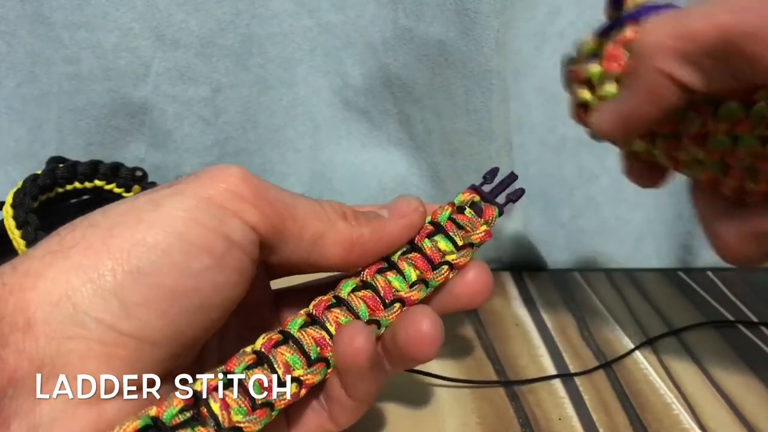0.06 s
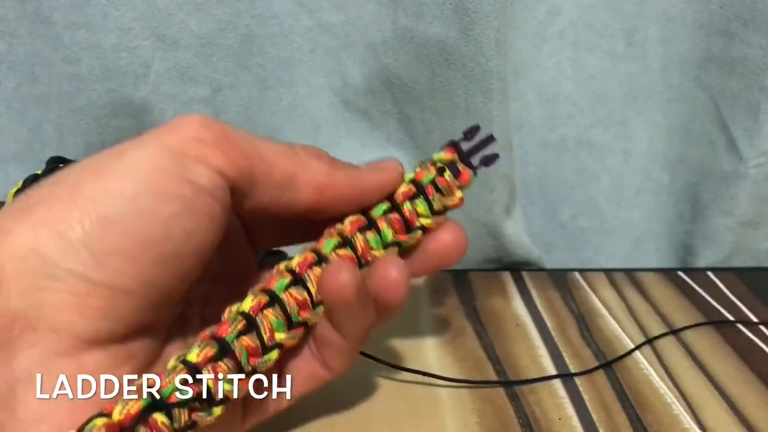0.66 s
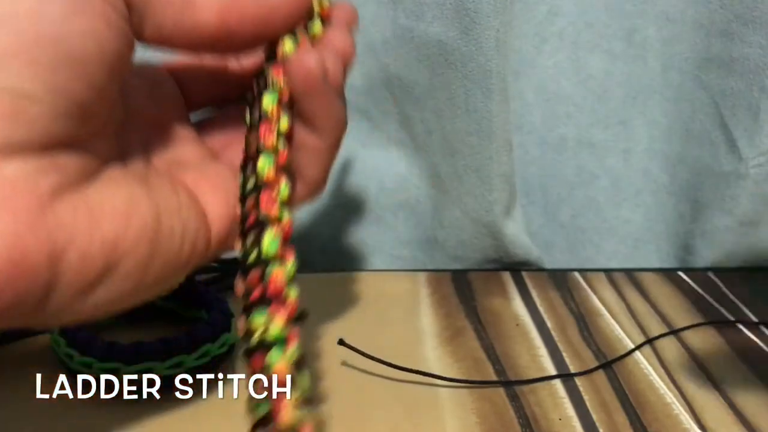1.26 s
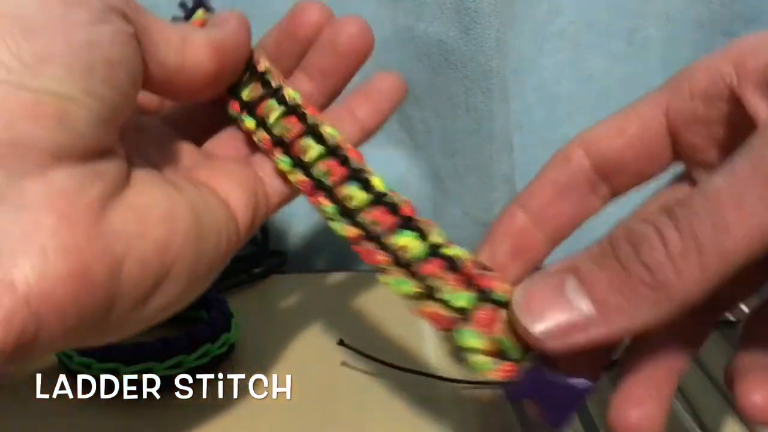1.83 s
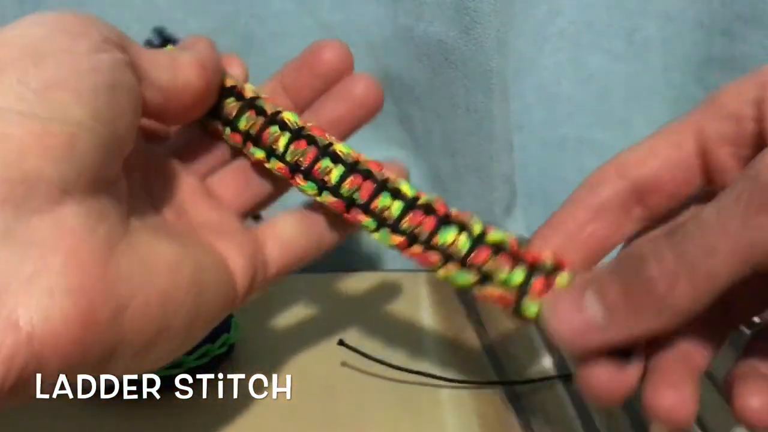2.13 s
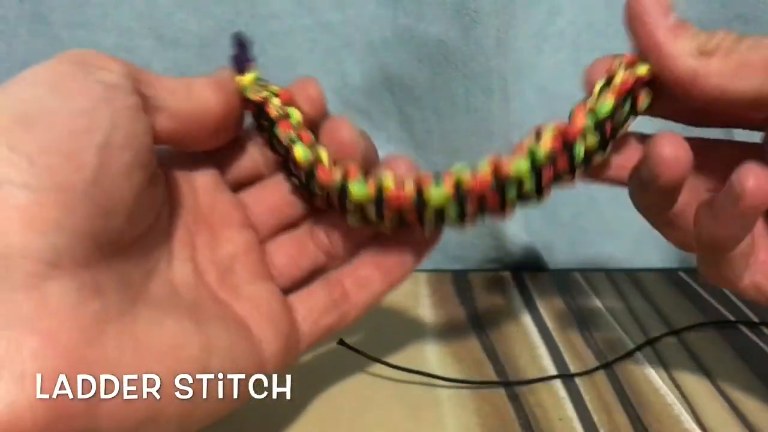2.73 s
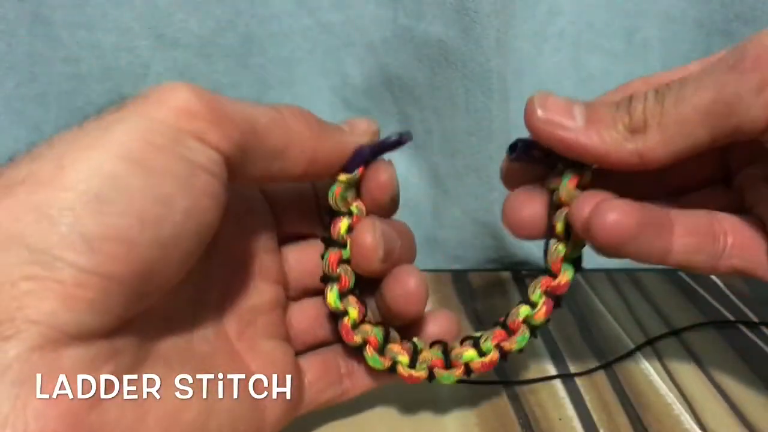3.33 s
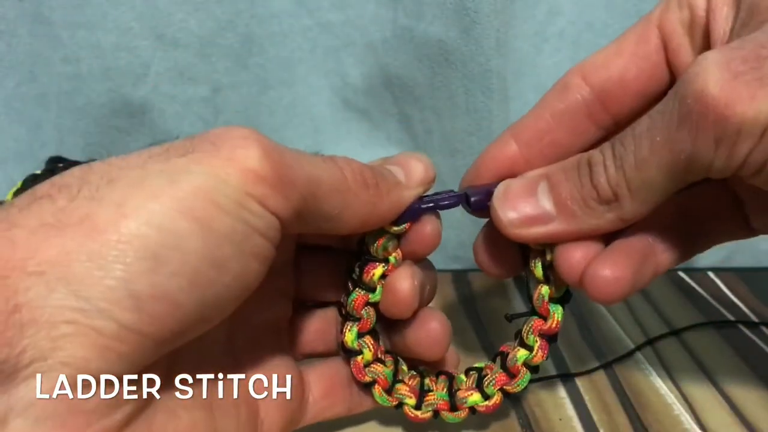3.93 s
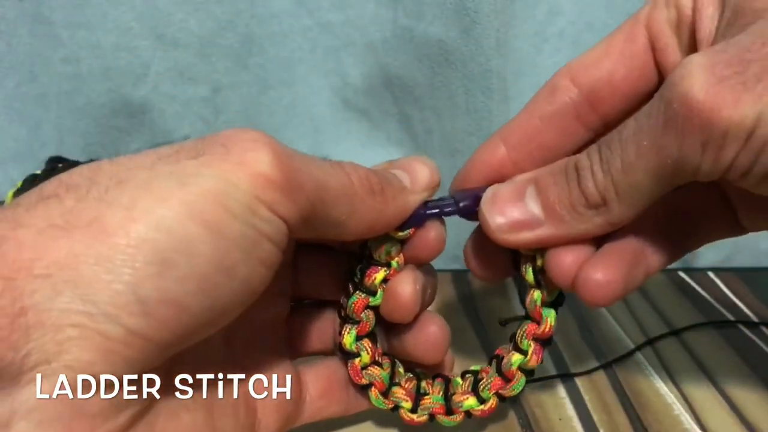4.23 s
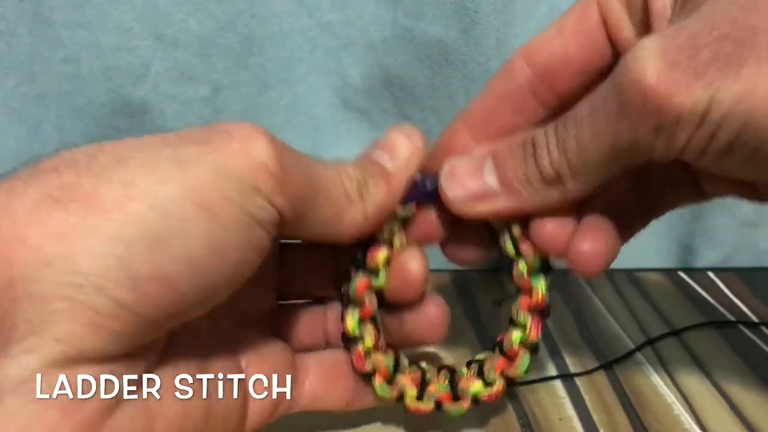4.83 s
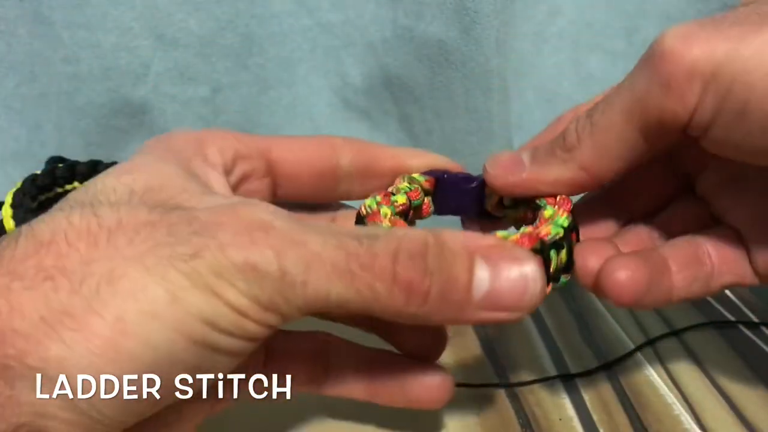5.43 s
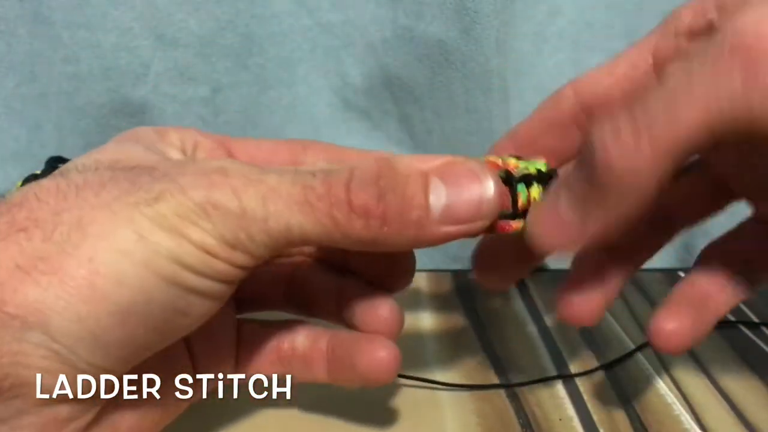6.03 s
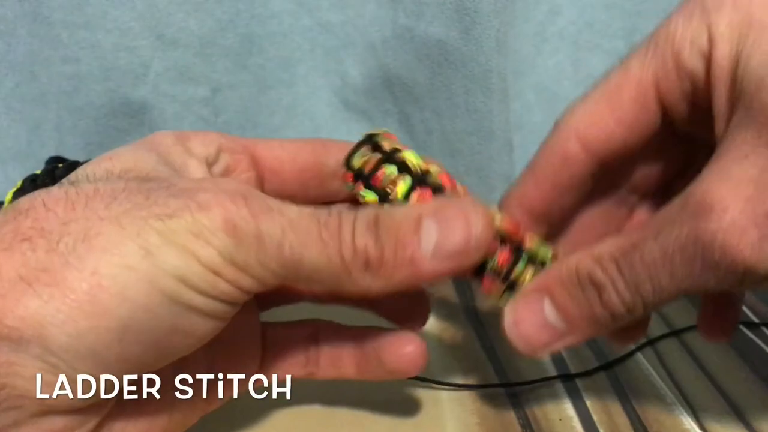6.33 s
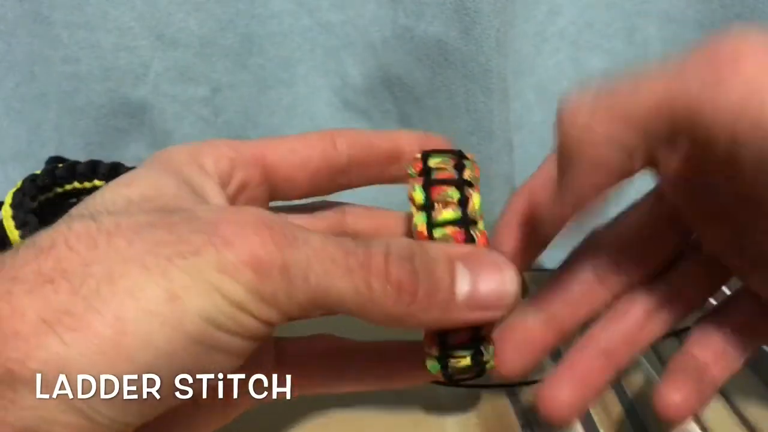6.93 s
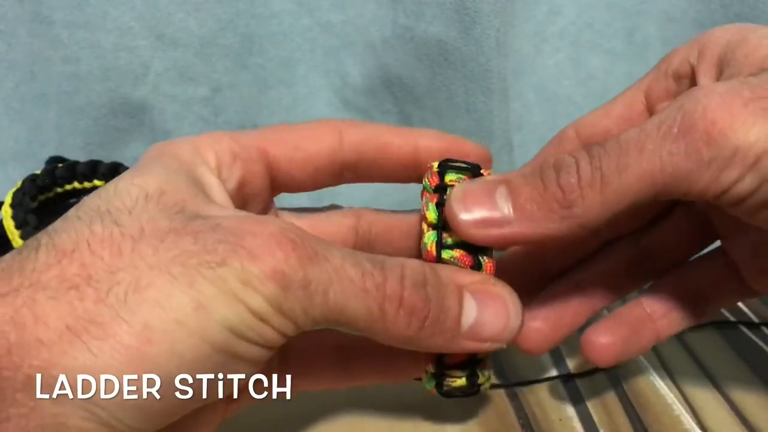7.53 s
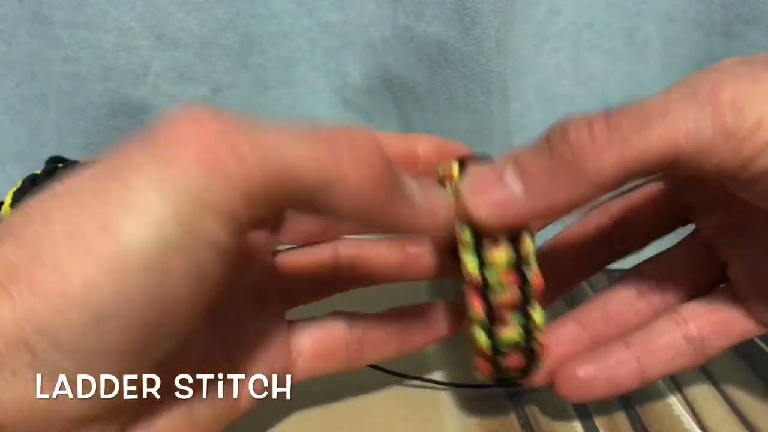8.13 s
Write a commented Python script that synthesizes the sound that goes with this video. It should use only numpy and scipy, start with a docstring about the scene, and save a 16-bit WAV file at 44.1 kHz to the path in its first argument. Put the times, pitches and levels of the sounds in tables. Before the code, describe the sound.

Soft, scratchy rustles come from a cord bracelet flexed between fingers, with one dull table bump early on. Small plastic ticks lead to a loud, crisp buckle snap a little past halfway, followed by a brief faint rise in hiss and a smaller click. Light handling then resumes. The sound is close and fairly dry, in a small room with a low fan and motor hum and faint electrical ticking.

```python
"""A woven cord bracelet and its plastic buckle, handled close to a microphone in a small, quiet room.
The weave rustles in short strokes of tiny fibre clicks; a hand bumps the table. The buckle halves
tick together, snap shut with a crack and a ring, and click again as they seat.
After the snap, the microphone's hiss rises for a moment and drops away.
Walls answer briefly over rumble, hiss, a distant fan and motor, and faint electrical ticking."""
import sys
import numpy as np
from scipy import signal
from scipy.fft import rfft, irfft, next_fast_len
from scipy.io import wavfile
from scipy.ndimage import uniform_filter1d, map_coordinates

SR = 44100
rng = np.random.default_rng(int(sys.argv[2]) if len(sys.argv) > 2 else 0)


def file_out(sig):
    """Save sig as 16-bit WAV at sys.argv[1]."""
    # one column per channel
    cols = np.atleast_2d(sig).T
    # limit, then scale
    lim = np.clip(cols, -1, 1)
    pcm = np.round(lim * 32767).astype(np.int16)
    wavfile.write(sys.argv[1], SR, pcm)


N = 360297
TIME = np.arange(N) / SR

# fibre hiss spectrum: f/Hz, level/dB
FIBRE_SPECTRUM = [(600, -16), (1500, -4), (2600, -2), (3700, -0.5), (5000, 2.5), (6800, -1.5), (8500, -1),
                  (10400, -5.5), (12200, 0), (15500, -7)]
# open buckle: f/Hz, level/dB, t60/s
OPEN_MODES = [(2490, -13, .018), (3573, -16.3, .0038), (3900, -.5, .0052), (4230, 6.3, .0051),
              (5800, -3.2, .008), (6540, 1.2, .0068), (7342, -8.7, .0061), (7687, -1.2, .0105),
              (8440, -2.5, .009), (11340, -1, .008), (12358, -12, .007), (13491, -12.5, .0062),
              (15159, -14.5, .01)]
# hollow knock of the buckle between fingers: f/Hz, level/dB, t60/s
KNOCK_MODES = [(420, -13, 0.0088), (740, -10, 0.007), (1220, -2.5, .013), (1530, -3.5, 0.01),
               (2392, -2, 0.018)]
# hands jolted by the prongs: f/Hz, level/dB, t60/s
HAND_MODES = [(85.2, -47, 0.11), (160, -48, 0.062), (309.8, -46, 0.034), (720, -44.5, .009)]


def undb(db):
    """Decibels to gain."""
    return 10 ** (np.asarray(db) / 20)


def unit(x):
    """Scale to rms 1."""
    return x / np.sqrt(np.mean(x ** 2))


def crest(x):
    """Scale to peak 1."""
    return x / np.abs(x).max()


def add(out, start_s, x):
    """Mix x into out from start_s on."""
    i = int(round(start_s * SR))
    x, i = x[max(-i, 0):], max(i, 0)
    out[i:i + len(x)] += x[:max(len(out) - i, 0)]


def colour(x, spectrum):
    """Filter by a curve of f/Hz, level/dB."""
    hz, db = np.transpose(spectrum)
    size = next_fast_len(len(x))
    bins_hz = np.maximum(np.fft.rfftfreq(size, 1 / SR), 1)
    gain = undb(np.interp(np.log(bins_hz), np.log(hz), db))
    return irfft(rfft(x, size) * gain, size)[:len(x)]


def resonate(x, hz, width_hz, stages=1):
    """Equal resonances in series, each width_hz wide, gain 1 at the centre."""
    hz, width_hz = min(hz, SR / 2 - 1000), min(width_hz, SR / 3)
    for _ in range(stages):
        x = signal.lfilter(*signal.iirpeak(hz, hz / width_hz, fs=SR), x)
    return x


def fade(t, t60_s):
    """Exponential decay, 60 dB in t60_s."""
    return np.exp(-np.log(1000) * t / t60_s)


def ring(modes, t, t60_scale=1):
    """Struck modes of alternating sign; a grip scales their decay time."""
    return sum((-1) ** k * undb(db) * np.sin(2 * np.pi * hz * t) * fade(t, t60_s * t60_scale)
               for k, (hz, db, t60_s) in enumerate(modes))


def burst(t, t60_s):
    """Decaying white noise."""
    return rng.standard_normal(len(t)) * fade(t, t60_s)


def grains(count, per_s=3000, spread_db=2.5):
    """Tiny random clicks, most weak, a few strong."""
    clicks = (rng.random(count) < per_s / SR) * rng.choice([-1, 1], count)
    return clicks * undb(spread_db * np.minimum(rng.exponential(size=count), 4))


def waver(count, window):
    """Random wobble of rms 1, smoothed twice over window samples."""
    return unit(uniform_filter1d(uniform_filter1d(rng.standard_normal(count), window), window))


def radiate(x, cutoff_hz=2150):
    """High-pass: the small buckle hardly moves air at low pitch."""
    return signal.sosfilt(signal.butter(4, cutoff_hz, "high", fs=SR, output="sos"), x)


def rustle(firm_db=-64.5, rasp_rel_width=.19, second_db=-6, swell_share=.23, release_s=.016):
    """Fibres slip and snag; the ribs of the weave rasp in two bands that follow finger speed."""
    # cord sliding on skin and itself: t/s, length/s, level/dB, main rasp/Hz, second rasp/Hz, snags/dB
    strokes = [ (-0.07, .25, -65.5, 3630, 6740, -23), (0.297, 0.064, -68, 6060, 11800, -10),
               (0.343, 0.15, -71.5, 4000, 6440, -4), (0.687, 0.068, -73.5, 5840, 9000, -12),
               (1.045, 0.086, -71.5, 12200, 4050, -8), (1.111, 0.064, -73, 9000, 4020, -6),
               (1.743, 0.036, -76, 7200, 12500, -4), (1.86, 0.048, -68, 7000, 11800, -2),
               (2.117, 0.033, -69.5, 8000, 12000, -6), (2.145, 0.066, -66.5, 7800, 3850, -3),
               (2.261, 0.075, -63.5, 7800, 11800, -10), (2.311, 0.063, -67.5, 6200, 7000, -6),
               (2.519, .11, -75, 6000, 9000, -7), (2.731, 0.054, -68.5, 6240, 4500, -4),
               (2.75, 0.031, -65.5, 13000, 11000, 1), (2.796, 0.22, -66.5, 6960, 4500, -13),
               (2.86, 0.1, -66.5, 5700, 4600, -9), (2.959, .037, -64, 5750, 4600, -8),
               (3.067, 0.083, -71.5, 3600, 6000, 4), (3.257, 0.051, -68, 9000, 3820, -1),
               (6.099, 0.15, -78, 5600, 9000, -1), (6.296, 0.07, -69, 11800, 9100, -8),
               (6.348, 0.12, -69, 11900, 2560, -11), (6.436, 0.067, -71, 4000, 6200, -9),
               (6.592, 0.1, -71, 6500, 9000, -5), (6.894, 0.038, -65, 5300, 11000, -5),
               (7.745, 0.038, -69.5, 6500, 11000, 6), (8.05, 0.053, -78, 6200, 9500, -3)]
    out, count = np.zeros(N), SR // 3
    for start_s, length_s, db, main_hz, second_hz, snag_db in strokes:
        t = TIME[:min(int(length_s * SR), count)]
        hiss = unit(colour(grains(count), FIBRE_SPECTRUM))
        main, second = (unit(resonate(grains(count), hz, rasp_rel_width * hz, stages=2))
                        for hz in (main_hz, second_hz))
        finger_speed = 1 + .035 * waver(count, window=900)
        rasp = map_coordinates(main + undb(second_db) * second, [np.cumsum(finger_speed)], mode="mirror")
        rasp_db = 1.5 + .63 * (db - firm_db)  # firmer strokes rasp more
        snags = unit(resonate(grains(count, per_s=160, spread_db=3.5), hz=9000, width_hz=9000))
        pressure = undb(waver(count, window=260))
        stroke = (hiss + undb(rasp_db) * rasp + undb(snag_db) * snags) * pressure
        envelope = np.minimum(t / (swell_share * length_s), 1) * np.minimum((length_s - t) / release_s, 1)
        add(out, start_s, undb(db) * unit(stroke[:len(t)]) * envelope)
    return out


def crinkle(per_s=40, db=-85.5, t60_s=.025):
    """Single fibres let go at random in the bent weave."""
    slips = (rng.random(N) < per_s / SR) * undb(np.minimum(rng.exponential(size=N), 3))
    envelope = signal.fftconvolve(slips, fade(TIME[:SR // 20], t60_s))[:N]
    return undb(db) * unit(envelope * colour(rng.standard_normal(N), FIBRE_SPECTRUM))


def noise_floor(db=-57):
    """Steady room rumble and microphone hiss."""
    # noise density: f/Hz, relative level/dB
    spectrum = [(15, -33.5), (32, -15), (65, -9), (110, -4.5), (190, -13), (330, -19), (430, -27),
                (750, -34.5), (1300, -38.5), (2000, -41.5), (2700, -41), (4500, -44.5), (10400, -48.5),
                (12000, -49), (15500, -49)]
    return undb(db) * unit(colour(rng.standard_normal(N), spectrum))


def fan():
    """A distant fan and a faint whine: narrow, wavering noise bands."""
    # hum bands: f/Hz, half-width per stage/Hz, level/dB
    bands = [(91, 7.2, -60), (151.3, 4, -65), (211.9, 6, -78), (261, 5.6, -78), (312.8, 9.8, -70.5),
             (511.4, 22, -80), (664, 30, -89), (1024.5, 60.1, -85), (1374, 40, -87.5), (9326, 230, -94)]
    out = np.zeros(N)
    for hz, half_width_hz, db in bands:
        band = resonate(rng.standard_normal(N + SR), hz, 2 * half_width_hz, stages=2)
        out += undb(db) * unit(band[SR:])  # skip the build-up
    return out


def motor(hz=53, db=-61, wander_hz=.61, swell_depth=.3):
    """A distant motor drones on one note, wandering in pitch and level."""
    phase = 2 * np.pi * np.cumsum(hz + wander_hz * waver(N, window=9000)) / SR
    swell = 1 + swell_depth * waver(N, window=7000)
    return undb(db) * unit(np.sin(phase) * swell)


def interference(first_s=.2248, period_s=.1024, db=-62):
    """Thin, evenly spaced electrical ticks of random strength in the microphone."""
    out, t = np.zeros(N), TIME[:SR // 100]
    for start_s in np.arange(first_s, N / SR, period_s):
        tick = crest(resonate(burst(t, t60_s=.0025), hz=14500, width_hz=5000, stages=2))
        add(out, start_s, undb(db + rng.uniform(-6, 5)) * tick)
    return out


def buckle_ticks(width_hz=4600, grip_detune=.032):
    """Scraping contacts ring the buckle, detuned by each grip, and knock the hollow socket."""
    # touches of buckle and nails: t/s, contact peak/dB, f/Hz, ring/dB re contact, knock/dB re contact
    touches = [ (0.274, -55, 6900, -11, -25), (0.812, -57, 6000, -10, -25), (0.9414, -50.5, 7300, -7, -8),
               (1.1196, -52, 6900, -2, -5.5), (1.779, -56.5, 7500, -12, -30), (1.897, -54, 11000, -10, -27),
               (2.1035, -49.5, 11800, -9, -28), (2.112, -54, 10500, -10, -30), (2.844, -55, 11500, 0, -25),
               (2.99, -47.5, 7400, -5, -28), (3.2688, -62, 10000, -8, -30), (3.5628, -53.5, 5500, -3, -25),
               (3.7139, -44.5, 10400, -9, -38), (3.909, -62, 8900, -10, -30), (3.959, -57, 3800, -9, -2),
               (3.9671, -51.5, 3700, -3, 2.5), (4.178, -61, 4220, -7, -2), (4.182, -54.5, 4220, -6, -6),
               (4.222, -52, 4700, -5, -20), (4.228, -52.5, 4700, -6, -16), (6.2774, -57.5, 6500, -2, -22),
               (6.476, -59, 5000, -6, -7), (6.602, -58, 10500, 2, -20), (6.667, -61, 9560, -8, -25),
               (6.673, -51, 9500, -2, -14), (6.684, -54, 9500, 5, -6), (6.8425, -48, 11600, -10, -12),
               (6.8461, -45.5, 4340, -9, -1.2), (6.851, -56, 10500, 1, -9), (6.928, -60.5, 10000, -3, -14)]
    out, t = np.zeros(N), TIME[:SR // 20]
    for start_s, db, hz, shell_db, knock_db in touches:
        contact = crest(resonate(burst(t, t60_s=.012), hz, width_hz, stages=2))
        tuning = 1 + grip_detune * rng.uniform(-.81, 1)
        shell = crest(radiate(ring(OPEN_MODES, t * tuning)))
        knock = crest(ring(KNOCK_MODES, t))
        add(out, start_s, undb(db) * (contact + undb(shell_db) * shell + undb(knock_db) * knock))
    return out


def table_bumps():
    """Hand and bracelet bump the table; longer contact gives a duller thud."""
    # impacts: t/s, peak/dB, contact/s
    bumps = [(0.9427, -51.5, 0.00021), (0.944, -30, 0.002), (1.122, -48, 0.00044)]
    # table top: f/Hz, level/dB, t60/s
    top_modes = [(91.3, -6.5, 0.21), (160, -2.5, .06), (258.3, -3, 0.2), (312, -4, .2), (381, -0.5, 0.048),
                 (600, 5.5, 0.046), (1100, 3, .011), (1320, 2, 0.016), (1630, 4, 0.016)]
    out, response = np.zeros(N), ring(top_modes, TIME[:SR // 3])
    for start_s, db, contact_s in bumps:
        push = np.hanning(int(contact_s * SR))
        add(out, start_s, undb(db) * crest(np.convolve(response, push)))
    return out


def strike(modes, t60_scale, crack_db, crack_hz, crack_width_hz, knock_db):
    """Plastic hits its stop with a crack, rings the buckle and knocks the socket."""
    t = TIME[:SR // 20]
    crack = radiate(crest(resonate(burst(t, t60_s=.014), crack_hz, crack_width_hz)))
    shell = crest(radiate(ring(modes, t, t60_scale)))
    knock = crest(ring(KNOCK_MODES, t))
    return shell + undb(crack_db) * crack + undb(knock_db) * knock


def buckle_snap():
    """The prongs spring into the socket in quick succession and jolt the hands."""
    # prong impacts: t/s, level/dB, t60 scale, crack/dB, crack f/Hz, crack width/Hz, knock/dB
    impacts = [(4.7433, -2.4, .95, -16, 8500, 9000, -35), (4.74442, -11, .75, -10, 10000, 7000, -38),
               (4.7594, -23, .6, -3, 7500, 3400, -15)]
    out = np.zeros(N)
    for start_s, db, *timbre in impacts:
        add(out, start_s, undb(db) * strike(OPEN_MODES, *timbre))
    add(out, impacts[0][0], ring(HAND_MODES, TIME[:SR // 5]))
    return out


def mic_hiss_rise(start_s=4.76, end_s=5.15, db=-64, rise_db=2.5, release_s=.017):
    """After the snap, the microphone's hiss rises for a moment and drops away."""
    hiss = unit(colour(rng.standard_normal(N), [(300, 4), (1500, 1.5), (6500, 0), (15500, -3.5)]))
    progress = np.clip((TIME - start_s) / (end_s - start_s), 0, 1)
    gate = (TIME > start_s) * np.exp(-np.maximum(TIME - end_s, 0) / release_s)
    return hiss * undb(db + rise_db * progress) * gate


def buckle_seating(start_s=5.4055, click_db=-20, jolt_db=-5):
    """The closed buckle settles with one short click and jolts the hands."""
    # closed buckle, stiffer and more damped: f/Hz, level/dB, t60/s
    closed_modes = [(3130, -11, 0.012), (3645, -12, .006), (4495, -2.5, .0067), (5200, -10.5, .0123),
                    (5918, 1.5, .0051), (7314, 2.5, .0031), (8634, 2.8, .0037), (10240, -6.8, .0066),
                    (10600, -3, .0041), (12133, 3, .0027), (13582, -15.1, .0092), (14950, -2.1, .0016)]
    out = np.zeros(N)
    click = strike(closed_modes, t60_scale=.92, crack_db=-14, crack_hz=12000, crack_width_hz=12000,
                   knock_db=-24)
    jolt = ring(HAND_MODES, TIME[:SR // 20])
    add(out, start_s, undb(click_db) * click + undb(jolt_db) * jolt)
    return out


def room(x, tail_db=-23, t60_s=.18, build_s=.008):
    """Adds three near reflections, scattered by uneven surfaces, and a short diffuse tail."""
    # tail colour: f/Hz, level/dB
    wall_spectrum = [(300, 0.5), (1250, 13), (2500, -1), (4200, -7.5), (5100, 1), (6400, -1), (8000, 1),
                     (9700, 4), (11400, -5.5), (13000, -2), (15500, 0.5)]
    # near surfaces: delay/s, level/dB
    reflections = [(.0089, -26.5), (.0132, -29), (0.0199, -38)]
    t = TIME[:SR // 2]
    tail = burst(t, t60_s) * (1 - np.exp(-(t / build_s) ** 2))
    response = undb(tail_db) * colour(tail / np.linalg.norm(tail), wall_spectrum)
    for delay_s, db in reflections:
        scatter = resonate(burst(TIME[:SR // 100], t60_s=.002), hz=7200, width_hz=6000)
        add(response, delay_s, undb(db) * scatter / np.linalg.norm(scatter))
    return x + signal.fftconvolve(x, response)[:N]


def scene():
    """Handling sounds in the room over the background, mono."""
    handling = rustle() + crinkle() + buckle_snap() + buckle_seating() + buckle_ticks() + table_bumps()
    return (room(handling) + mic_hiss_rise() + noise_floor() + fan() + motor() + interference())[None]


def record(dry):
    """An inverted echo in the microphone port ripples the treble; a low-pass cuts the top."""
    echo_samples, echo_db, cutoff_hz = 17, -18, 15750
    rippled = dry - undb(echo_db) * np.roll(dry, echo_samples, axis=1)
    return signal.sosfilt(signal.ellip(10, .1, 80, cutoff_hz, fs=SR, output="sos"), rippled)


dry = scene()
out = record(dry)
file_out(out)
```